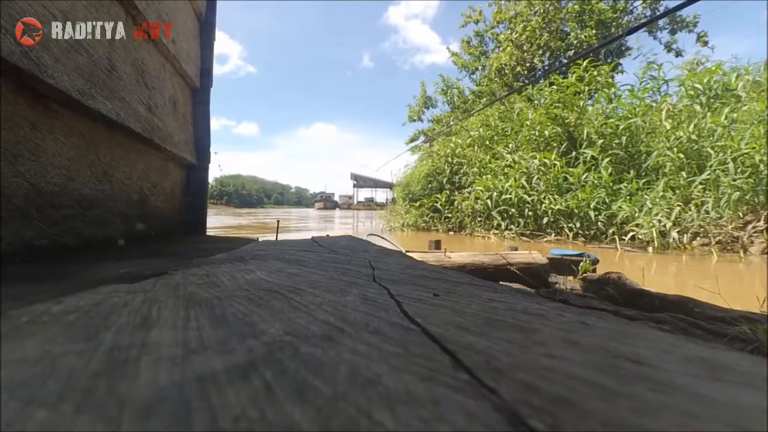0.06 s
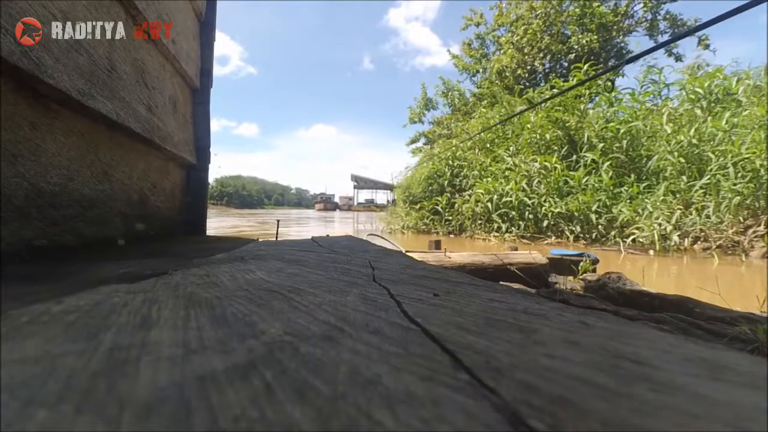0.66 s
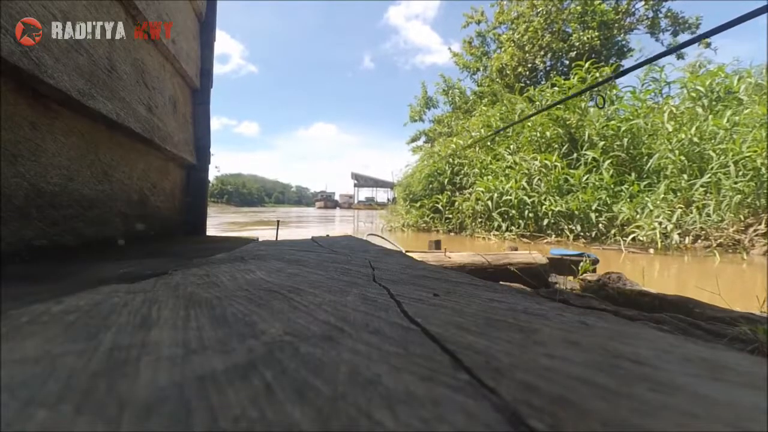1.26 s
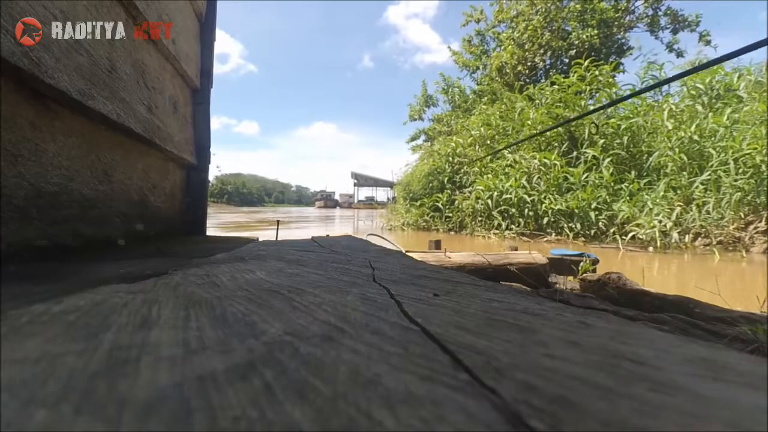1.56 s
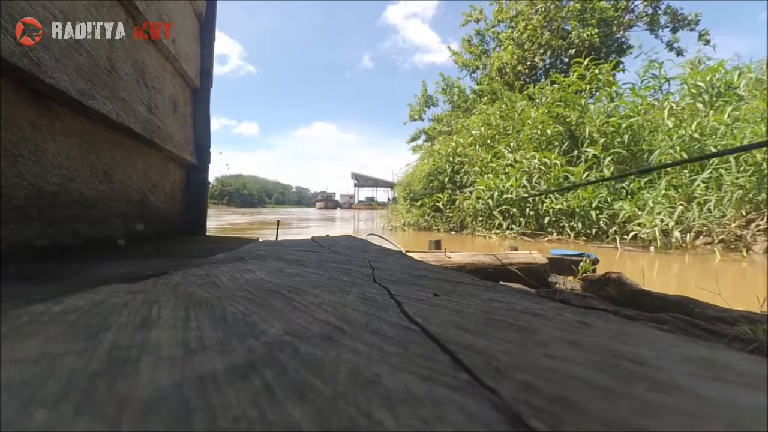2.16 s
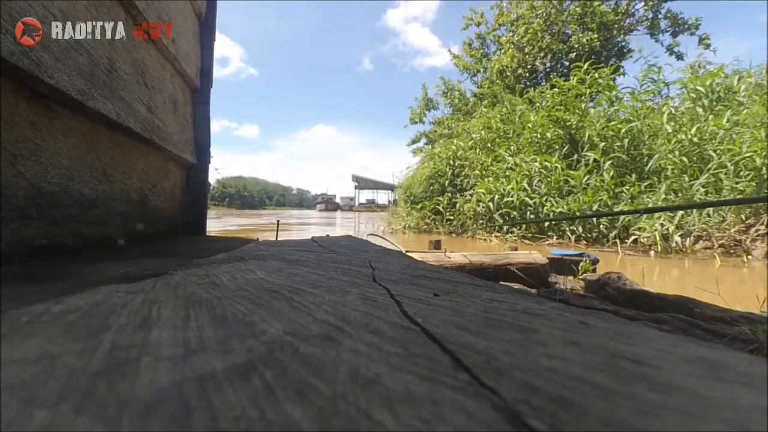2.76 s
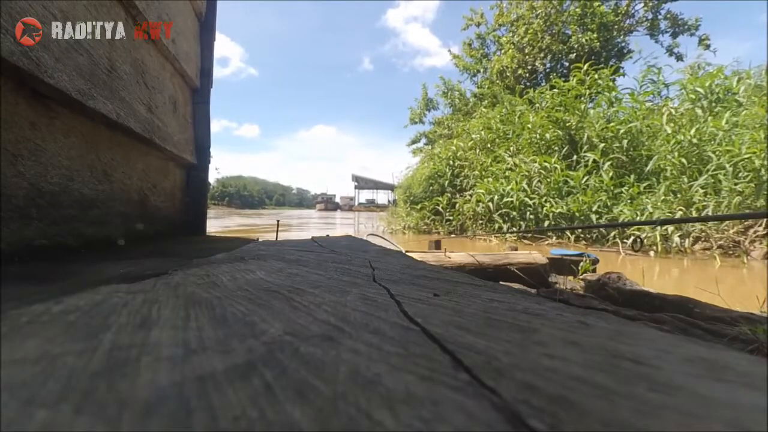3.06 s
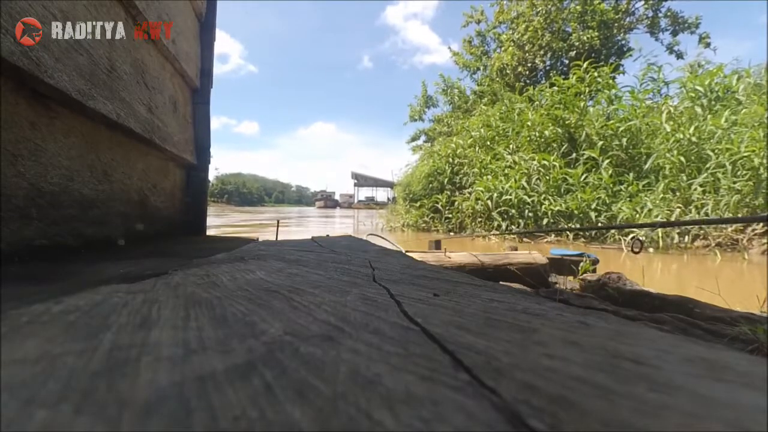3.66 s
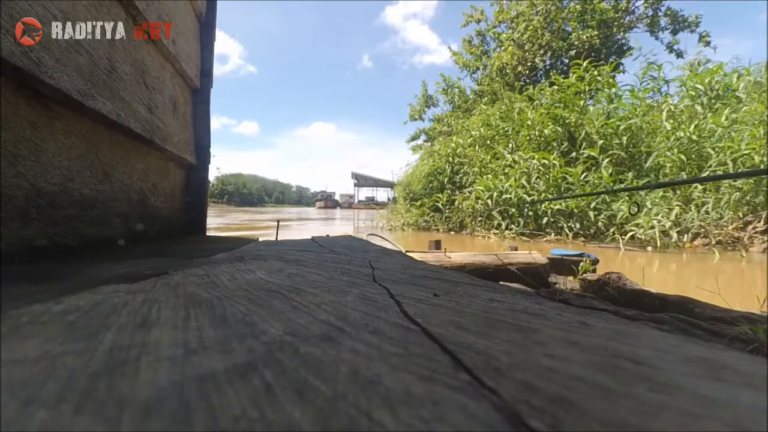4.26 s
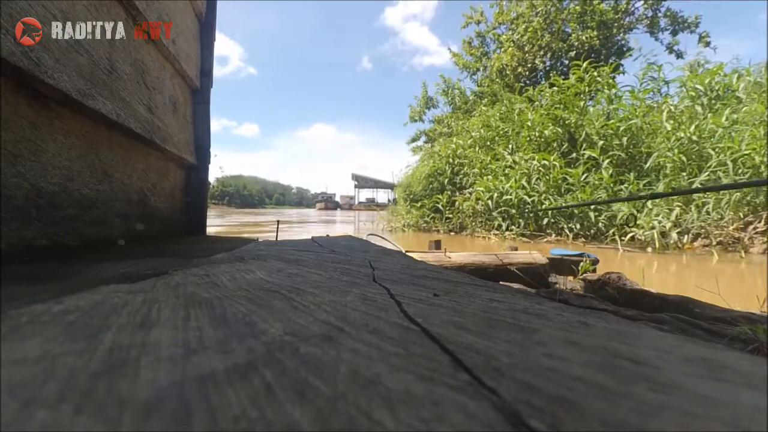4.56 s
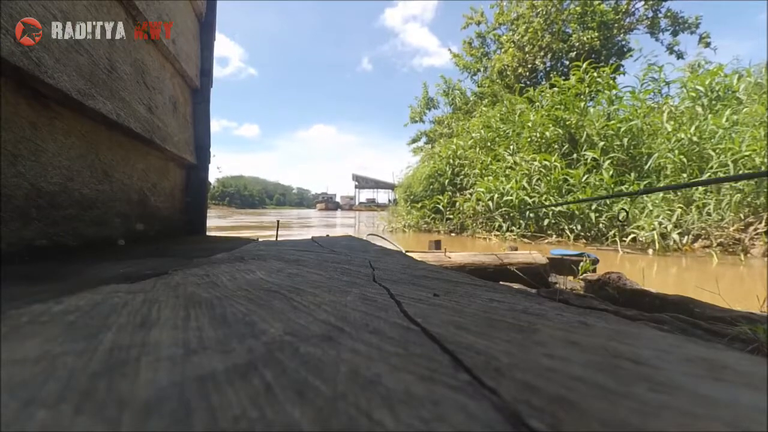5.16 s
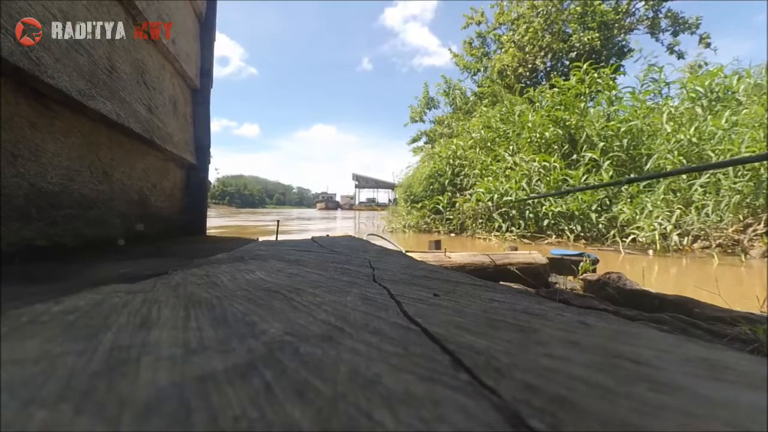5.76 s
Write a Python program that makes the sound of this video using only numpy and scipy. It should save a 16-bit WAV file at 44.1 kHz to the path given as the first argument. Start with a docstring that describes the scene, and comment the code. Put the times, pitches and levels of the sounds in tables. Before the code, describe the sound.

Small birds squawk, chip and trill hoarsely by a river, over a distant boat engine's low hum and wind rumbling on the microphone.

```python
"""Swiftlets twitter by a river, heard from a wooden landing: raspy squawks, sharp chips, dipping swoops
and fast trills. A distant boat engine hums, wind rumbles on the microphone and bubbles plop, over river
hiss and the high hush of a distant colony. Each call is a whistle from the syrinx, made hoarse by a
second voice and coloured by throat and beak. Calls and plops echo off planks and bushes."""
import sys
import numpy as np
from scipy import signal
from scipy.fft import rfft, irfft, next_fast_len
from scipy.io import wavfile

SR = 44100
rng = np.random.default_rng(int(sys.argv[2]) if len(sys.argv) > 2 else 0)


def waveform_to_disk(signal):
    """Save audio, clipped to [-1, 1], as 16-bit WAV at the path in sys.argv[1]."""
    frames = np.transpose(np.atleast_2d(signal))
    scaled = np.clip(frames, -1, 1) * 32767
    samples = np.round(scaled).astype(np.int16)
    wavfile.write(sys.argv[1], SR, samples)


N = 256291
TIME = np.arange(N) / SR


def from_db(db):
    """Decibels to gain."""
    return 10 ** (np.asarray(db) / 20)


def rms_one(x):
    """Scale to rms 1."""
    return x / np.sqrt(np.mean(x ** 2) + 1e-20)


def butter(x, hz, kind, order=2):
    """Butterworth filter."""
    sos = signal.butter(order, np.clip(hz, 10, .45 * SR), kind, fs=SR, output="sos")
    return signal.sosfilt(sos, x)


def flutter(hz, size=N):
    """Random wavering up to about hz, rms 1."""
    rolloff = 1 + (np.fft.rfftfreq(size, 1 / SR) / hz) ** 2
    return rms_one(irfft(rfft(rng.standard_normal(size)) / rolloff, size))


def wobble(t, hz):
    """Flutter over one call."""
    return flutter(hz, 8192 + len(t))[:len(t)]


def noise(spectrum):
    """Noise shaped by rows of (frequency [Hz], relative density [dB]), rms 1."""
    hz, db = np.transpose(spectrum)
    log_hz = np.log(np.fft.rfftfreq(N, 1 / SR) + 1)
    gain = from_db(np.interp(log_hz, np.log(hz), db, left=-80, right=-140))
    return rms_one(irfft(rfft(rng.standard_normal(N)) * gain, N))


def add(track, start_s, sound):
    """Mix a sound in at start_s."""
    i = max(round(start_s * SR), 0)
    track[i:i + len(sound)] += sound[:max(N - i, 0)]


def arch(t, pitches_hz):
    """Parabola through a call's start, middle and end pitch."""
    return np.polyval(np.polyfit([0, .5, 1], pitches_hz, 2), t / t[-1])


def syrinx(t, contour_hz, notes_per_s, dip_db, rasp, *, note_fall, second_voice, sideband, jitter,
           meander, hiss_db, beat_spread, stumble=6, sharpness=2.7):
    """A whistle chopped into falling notes; the syrinx's other side beats against it, hoarsely."""
    strength = wobble(t, 78)
    # deep trills keep time, shallow ones stumble
    note_phase = 2 * np.pi * (t - .003) * notes_per_s + strength * stumble / (2 + abs(dip_db))
    # pitch falls through the loud part of a note and recovers in the dip
    fall = note_fall * dip_db / 40 * np.sin(note_phase)
    hz = contour_hz * (1 - fall + jitter * rasp * wobble(t, 530) + meander * wobble(t, 78))
    phase = 2 * np.pi * np.cumsum(hz) / SR
    whistle = sum(from_db(db) * np.sin(k * phase) for k, db in enumerate((0, 0, -18, -26), 1))
    beat_hz = second_voice * contour_hz * (1 + beat_spread * wobble(t, 327))
    beat = np.sin(2 * np.pi * np.cumsum(beat_hz) / SR)
    hoarseness = rasp * (2 * sideband * beat + .45 * wobble(t, 1300))
    air = rms_one(butter(rng.standard_normal(len(t)), 10000, "low", order=1))
    hiss = from_db(hiss_db) * (2.26 * rasp + dip_db / 22) * air
    edges = np.clip(np.minimum(t / .001, (t[-1] - t) / .0021), 0, 1)
    notes_db = dip_db * np.abs(np.cos(note_phase / 2)) ** sharpness + 1.9 * strength
    return (whistle * (1 + hoarseness) + hiss) * edges * from_db(notes_db)


def resonate(x, top_hz=6900, leak_db=-15):
    """Each resonance lifts its band and rings briefly; little passes above top_hz."""
    # resonances of every call: (centre [Hz], width [Hz], boost [dB])
    resonances = [(1660, 245, 9), (2130, 214, 8.5), (2545, 67, 5), (3380, 600, 6), (4585, 160, 8),
                  (5410, 100, 8.5), (5650, 306, 5.5), (6600, 280, 1.5)]
    for hz, width_hz, db in resonances:
        x = x + (from_db(db) - 1) * signal.lfilter(*signal.iirpeak(hz, hz / width_hz, fs=SR), x)
    return butter(x, top_hz, "low", order=6) + from_db(leak_db) * x


def three_bands(x, edges_hz=(3400, 6700)):
    """Split into the bands of fundamental, octave and upper partials."""
    size = next_fast_len(len(x) + 256)
    hz, spectrum = np.fft.rfftfreq(size, 1 / SR), rfft(x, size)
    low, below_top = (irfft(spectrum / (1 + (hz / edge) ** 20), size)[:len(x)] for edge in edges_hz)
    return low, below_top - low, x - below_top


def beak(voice, contour_hz, level_db, octave_db, upper_db, gap_db, gap_hz=3400, gap_width_hz=800):
    """The throat cuts or fills the gap below the octave; the beak opens with pitch, adding treble."""
    gap = signal.lfilter(*signal.iirpeak(gap_hz, gap_hz / gap_width_hz, fs=SR), voice)
    voice = resonate(voice + (from_db(gap_db) - 1) * gap)
    fundamental, octave, upper = map(rms_one, three_bands(voice))
    rise_hz = contour_hz - contour_hz.mean()
    octave_gain = from_db(octave_db + .015 * rise_hz)
    upper_gain = from_db(upper_db + .005 * rise_hz)
    body = (fundamental + octave_gain * octave) / np.hypot(1, octave_gain)
    return from_db(level_db) * (body + upper_gain * upper)


def squawks(abrupt_hz=2450, gain_db=-.5, upper_gain_db=-.2):
    """Short hoarse calls; those that start high set in abruptly, lower ones swell."""
    # (start [s], end [s], start pitch [Hz], mid pitch [Hz], end pitch [Hz], note rate [1/s], dip [dB],
    #  rasp [0-1], level [dB], octave re fundamental [dB], upper partials [dB], swell [dB])
    calls = [(0, 0.081, 2600, 2390, 2600, 78, 12, 0.3, -29.0, -0.5, -19.0, 3),
             (0.086, 0.116, 2400, 2100, 1800, 35, 3.5, 0.3, -31.5, -7.0, -24.0, 0),
             (0.211, 0.307, 2120, 2380, 2375, 150, 8, 0.25, -32.0, -1.5, -19.5, -6),
             (0.403, 0.484, 2270, 2290, 2360, 58, 6, 0.4, -31.5, -3.0, -16.5, -4),
             (0.487, 0.529, 2525, 2540, 2575, 64, 6, 0.7, -29.0, 0.0, -12.5, -1),
             (0.6, 0.645, 2140, 2300, 2360, 190, 5.5, 0.35, -33.5, -3.5, -19.0, 1),
             (0.646, 0.693, 2430, 2435, 2590, 100, 1, 0.4, -28.0, -4.0, -16.5, 1),
             (0.795, 0.86, 2110, 2300, 2280, 120, 7.5, 0.33, -31.5, -2.5, -18.5, -2),
             (0.863, 0.88, 2470, 2350, 2270, 62, 6.5, 0.95, -28.5, 3.0, -11.0, -3),
             (0.983, 1.027, 2690, 2720, 2590, 80, 0.5, 0.65, -25.5, 3.0, -12.0, 1),
             (1.027, 1.041, 2350, 2330, 2320, 110, 5, 0.1, -32.0, 1.0, -13.5, -1),
             (1.142, 1.168, 2680, 2500, 2350, 91, 11, 0.55, -33.0, 5.0, -13.0, 2),
             (1.185, 1.213, 2400, 2380, 2335, 91, 11, 0.6, -37.5, 2.5, -8.5, -3),
             (1.846, 1.872, 2630, 2800, 2600, 103, 12, 0.55, -35.0, 7.0, -19.5, -8),
             (2.779, 2.825, 2360, 2390, 2710, 96, 16, 0.85, -36.5, 2.5, -16.0, -11),
             (2.849, 2.868, 2500, 2650, 2300, 120, 10, 0.4, -30.5, 4.5, -23.0, 0),
             (3.556, 3.579, 2820, 3060, 2600, 70, 5, 0.25, -33.5, 14.0, -16.5, -3),
             (3.584, 3.628, 2660, 2345, 2690, 123, 13, 0.45, -35.5, 2.5, -18.0, -3),
             (3.662, 3.708, 2690, 2605, 2560, 117, 12, 0.4, -34.5, 8.5, -17.5, -9),
             (4.826, 4.84, 3050, 2900, 2680, 164, 10, 0.7, -34.0, 13.5, -14.0, 2),
             (4.905, 4.924, 2680, 2560, 2400, 120, 12, 0.45, -30.0, 9.0, -21.5, -2),
             (5.722, 5.796, 2710, 2735, 2855, 98, 3.5, 0.4, -30.0, 7.0, -16.5, 2)]
    out = np.zeros(N)
    for start_s, end_s, *pitches_hz, notes_per_s, dip_db, rasp, db, octave_db, upper_db, swell_db in calls:
        t = TIME[TIME < end_s - start_s]
        contour_hz = arch(t, pitches_hz)
        voice = syrinx(t, contour_hz, notes_per_s, dip_db, rasp, note_fall=.074, second_voice=.23,
                       sideband=.58, jitter=.07, meander=.028, hiss_db=-14, beat_spread=.27)
        attack_s = max(.014 * (abrupt_hz - pitches_hz[0]) / 300, .0005)
        voice *= (1 - np.exp(-t / attack_s)) * from_db(swell_db * t / t[-1])
        call = beak(voice, contour_hz, db + gain_db, octave_db, upper_db + upper_gain_db, gap_db=-4.5)
        add(out, start_s, call)
    return out


def engine(firing_hz=64.01, waver=.02012, swell_db=3):
    """Distant boat: only the low exhaust lines carry across the water."""
    # exhaust lines: (multiple of firing rate, level [dB])
    lines = [(1, -27.4), (1.5, -46.5), (2, -43.5), (2.6, -45.5), (3, -48.5)]
    phase = 2 * np.pi * np.cumsum(firing_hz * (1 + waver * flutter(4.3))) / SR
    out = np.zeros(N)
    for multiple, db in lines:
        amplitude = np.sqrt(2) * from_db(db + swell_db * flutter(3.6))
        out += amplitude * np.sin(multiple * phase + .38 * flutter(8))
    return out


def wind(rumble_gain_db=.1, breeze_buffet_db=-9.5):
    """Slow eddies rumble; gusts swell on top and buffet the microphone port in a higher band."""
    # breeze: (time [s], rumble [dB])
    breeze = [(0, -23.5), (1.1, -22), (1.32, -32), (1.55, -24.5), (3.05, -23.5), (3.4, -28), (3.8, -32),
              (4.25, -25.5), (4.85, -29), (5.2, -25.5), (5.8, -27)]
    # gusts: (centre [s], half-width [s], rumble [dB], buffet [dB])
    gusts = [(.52, .06, -27, -21), (.69, .05, -22, -17.5), (1.02, .06, -15, -23), (1.045, .012, -16, -13),
             (1.72, .07, -16, -16.5), (1.99, .08, -20, -19.5), (2.09, .06, -14.5, -28),
             (2.25, .12, -16, -27), (2.5, .08, -27, -20), (2.59, .045, -10.5, -21), (3.13, .06, -17.5, -25),
             (3.27, .08, -30, -23), (4.09, .06, -15, -27), (4.56, .07, -17, -32), (5.07, .1, -20, -28)]
    # eddy spectrum: (frequency [Hz], relative density [dB])
    rumble_spectrum = [(12, 5), (22, 22), (32, 8.5), (50, 7.5), (80, -13), (160, -51)]
    # buffeting spectrum: (frequency [Hz], relative density [dB])
    buffet_spectrum = [(35, 4), (60, 8), (95, 4), (160, -4.5), (240, -18), (500, -38.5), (1000, -56)]
    breeze_db = np.interp(TIME, *np.transpose(breeze))
    rumble, buffet = from_db(breeze_db), from_db(breeze_db + breeze_buffet_db)
    for centre_s, half_width_s, rumble_db, buffet_db in gusts:
        swell = np.exp(-2 * ((TIME - centre_s) / half_width_s) ** 2)
        rumble = np.hypot(rumble, from_db(rumble_db) * swell)
        buffet = np.hypot(buffet, from_db(buffet_db) * swell)
    return from_db(rumble_gain_db) * rumble * noise(rumble_spectrum) + buffet * noise(buffet_spectrum)


def river_and_colony(level_db=-42.8):
    """Steady river hiss with the high hush of a distant swiftlet colony."""
    # hiss and hush: (frequency [Hz], relative density [dB])
    spectrum = [(130, -3.5), (185, 2.5), (245, -11), (320, -12.5), (490, -15), (680, -19.5), (1350, -27),
                (2300, -31), (3300, -28.5), (4700, -30), (5600, -31.5), (8000, -41.5), (12500, -41),
                (16000, -50)]
    return from_db(level_db) * noise(spectrum)


def chip(hz, typical_s=.0075, fall_octaves=.39, rasp=.6, octave_db=-25, scratch_db=-5):
    """One brief falling note, split by the second voice into a rough tick; peak 1."""
    t = np.arange(SR // 40) / SR
    chance = rng.standard_normal(len(t))
    length_s, beat_hz = typical_s * from_db(chance[0]), 930 * from_db(chance[1])
    progress = np.minimum(t / length_s, 1)
    phase = 2 * np.pi * np.cumsum(hz * 2 ** (fall_octaves * (.3 - progress))) / SR
    whistle = np.sin(phase) + from_db(octave_db) * np.sin(2 * phase)
    beating = 1 + rasp * np.sin(2 * np.pi * (beat_hz * t + chance[2]))
    scratch = from_db(scratch_db) * rms_one(butter(chance, [2600, 7500], "band", order=1))
    envelope = np.sin(np.pi * progress ** .5) ** 2
    tick = resonate((whistle * beating + scratch) * envelope)
    return tick / np.abs(tick).max()


def chips(gain_db=-.2, after_db=-5, fall_octaves_per_s=21):
    """Sharp chips, some trailed by one or two softer, lower, purer after-notes."""
    # (time [s], level [dB], pitch [Hz], after-notes [count], spacing [s])
    calls = [(.1607, -26, 4300, 0, 0), (.3044, -27.5, 3720, 0, 0), (.3975, -27.5, 2590, 0, 0),
             (.9593, -23.5, 4460, 1, .0092), (1.066, -25.5, 4010, 0, 0), (1.128, -20, 5200, 0, 0),
             (1.2284, -22.5, 4260, 1, .022), (1.295, -26.5, 2330, 0, 0), (1.322, -25, 4420, 0, 0),
             (1.381, -27.5, 4540, 0, 0), (1.4136, -29, 3770, 1, .0275), (1.5524, -27, 4530, 0, 0),
             (1.937, -29, 5240, 0, 0), (1.9444, -19.5, 4570, 1, .007), (2.378, -19, 4260, 1, .011),
             (2.5935, -26, 5040, 0, 0), (2.8834, -27.5, 2530, 0, 0), (3.0535, -25.5, 4210, 0, 0),
             (3.1485, -24, 4260, 0, 0), (3.4014, -28, 2220, 0, 0), (3.7325, -19, 4540, 2, .0145),
             (3.9855, -28.5, 1820, 0, 0), (4.0425, -18, 4630, 2, .0175), (4.147, -25, 4530, 0, 0),
             (4.2554, -23.5, 4560, 1, .0096), (4.2867, -18, 4220, 2, .0175), (4.4135, -23, 3670, 0, 0),
             (4.4959, -20, 4530, 2, .0134), (4.537, -30.5, 5440, 0, 0), (4.941, -27, 4600, 0, 0),
             (5.0464, -27.5, 4660, 0, 0), (5.438, -25.5, 5150, 0, 0), (5.5104, -22.5, 4400, 1, .011),
             (5.5937, -25.5, 4840, 0, 0), (5.797, -22, 5450, 0, 0)]
    out = np.zeros(N)
    for start_s, db, hz, after_notes, spacing_s in calls:
        add(out, start_s, from_db(db + gain_db) * chip(hz))
        for delay_s in spacing_s * np.arange(1, round(after_notes) + 1):
            note = chip(hz * 2 ** (-fall_octaves_per_s * delay_s), rasp=.45, scratch_db=-10)
            add(out, start_s + delay_s, from_db(db + after_db) * note)
    return out


def swoops(dive_db=2.2, climb_db=-2, fade_db=-5):
    """A loud dive in pitch, second voice an octave below, then a softer buzzing climb that fades."""
    # (start [s], turn [s], end [s], start pitch [Hz], turn pitch [Hz], end pitch [Hz], rasp [0-1],
    #  level [dB], octave re fundamental [dB], upper partials [dB])
    calls = [(1.664, 1.706, 1.82, 2830, 2200, 2450, 0.7, -33.0, 4.0, -16.5),
             (2.608, 2.655, 2.768, 2850, 1900, 2770, 0.5, -31.0, 6.0, -17.0),
             (4.637, 4.686, 4.78, 2800, 2150, 2730, 0.55, -32.5, 5.5, -10.5)]
    out = np.zeros(N)
    for start_s, turn_s, end_s, start_hz, turn_hz, end_hz, rasp, db, octave_db, upper_db in calls:
        t = TIME[TIME < turn_s - start_s]
        dive_hz = start_hz + (turn_hz - start_hz) * t / t[-1]
        dive = syrinx(t, dive_hz, notes_per_s=95, dip_db=3.5, rasp=rasp, note_fall=.09, second_voice=.5,
                      sideband=.75, jitter=.06, meander=.025, hiss_db=-13, beat_spread=.15)
        add(out, start_s, beak(dive, dive_hz, db + dive_db, octave_db, upper_db - .5, gap_db=4))
        t = TIME[TIME < end_s - turn_s]
        climb_hz = turn_hz + (end_hz - turn_hz) * (t / t[-1]) ** .75
        climb = syrinx(t, climb_hz, notes_per_s=165, dip_db=8, rasp=rasp, note_fall=.074,
                       second_voice=.31, sideband=.6, jitter=.085, meander=.022, hiss_db=-12,
                       beat_spread=.28)
        climb *= from_db(fade_db * t / t[-1])
        add(out, turn_s, beak(climb, climb_hz, db + climb_db, octave_db, upper_db - 5, gap_db=1.5))
    return out


def trills(dip_db=23, accent_db=3, accent_s=.02, gain_db=-.5):
    """Runs of clipped notes along one arch of pitch, clearest at the top, rougher lower down."""
    # (start [s], end [s], start pitch [Hz], mid pitch [Hz], end pitch [Hz], note rate [1/s],
    #  base rasp [0-1], level [dB], octave re fundamental [dB], upper partials [dB])
    calls = [(1.978, 2.174, 2480, 2290, 1860, 84, .4, -35, 1, -23),
             (2.187, 2.377, 2700, 2900, 2520, 82, .45, -34, 13, -14.5),
             (3.184, 3.307, 2560, 2720, 2620, 78.5, .8, -30, 9, -16),
             (3.323, 3.394, 2750, 2480, 2250, 73, .75, -31.5, 5, -18),
             (3.804, 3.975, 2500, 2270, 1860, 79, .45, -34.3, 1.5, -22),
             (5.166, 5.37, 2700, 2930, 2430, 78, .45, -32.3, 13, -15.5)]
    out = np.zeros(N)
    for start_s, end_s, *pitches_hz, notes_per_s, rasp, db, octave_db, upper_db in calls:
        t = TIME[TIME < end_s - start_s]
        contour_hz = arch(t, pitches_hz)
        roughening = np.clip(.75 + (contour_hz.max() - contour_hz) / 700, 0, 1.6)
        voice = syrinx(t, contour_hz, notes_per_s, dip_db, rasp * roughening, note_fall=.07,
                       second_voice=.33, sideband=.55, jitter=.055, meander=.018, hiss_db=-16,
                       beat_spread=.25, stumble=9, sharpness=2.8)
        voice *= from_db(accent_db * np.exp(-t / accent_s))   # first notes pushed harder
        add(out, start_s, beak(voice, contour_hz, db + gain_db, octave_db, upper_db, gap_db=3.5))
    return out


def plops(decay_s=.0032, rise_per_s=24, splash_db=-4):
    """Bubbles at the landing ring briefly and rise in pitch, each with a tiny splash."""
    # (time [s], level [dB], start pitch [Hz])
    bubbles = [(2.963, -37, 467), (3.459, -36.5, 436), (4.222, -32.5, 513), (4.395, -32.5, 476),
               (4.414, -42, 554), (4.45, -33.5, 980), (4.533, -33.5, 530)]
    out, t = np.zeros(N), np.arange(SR // 25) / SR
    for start_s, db, hz in bubbles:
        ring = np.sin(2 * np.pi * hz * t * (1 + rise_per_s * t))
        splash = rms_one(butter(rng.standard_normal(len(t)), [hz, 3.5 * hz], "band"))
        add(out, start_s, from_db(db) * (ring + from_db(splash_db) * splash) * np.exp(-t / decay_s))
    return out


def riverbank(x, planks_db=-9, planks_t60_s=.12, bushes_db=-18, bushes_t60_s=.28, leaves_hz=6000):
    """Quick reflections off the planks and a faint, longer, dull scatter from the bushes."""
    t = np.arange(SR // 2) / SR
    planks, bushes = rng.standard_normal((2, len(t))) * (t > .0015)
    planks = planks * from_db(-60 * t / planks_t60_s)
    bushes = butter(bushes, leaves_hz, "low") * from_db(-60 * t / bushes_t60_s)
    echoes = from_db(planks_db) * planks / np.linalg.norm(planks)
    echoes += from_db(bushes_db) * bushes / np.linalg.norm(bushes)
    return x + signal.fftconvolve(x, echoes)[:N]


def scene():
    """Birds and plops with their echoes, over engine, wind, river and distant colony; mono."""
    birds = butter(squawks() + trills() + swoops() + chips(), 1360, "high", order=4)
    return (riverbank(birds + plops()) + engine() + wind() + river_and_colony())[None]


def record(dry):
    """Steep low-pass at 15.9 kHz."""
    return signal.sosfilt(signal.ellip(10, .1, 80, 15900, fs=SR, output="sos"), dry)


dry = scene()
out = record(dry)
waveform_to_disk(out)
```